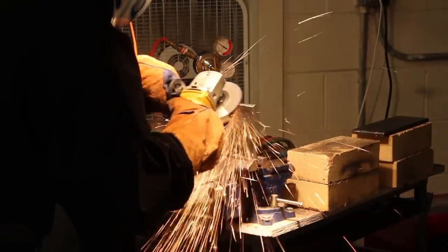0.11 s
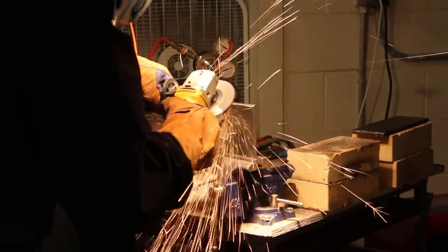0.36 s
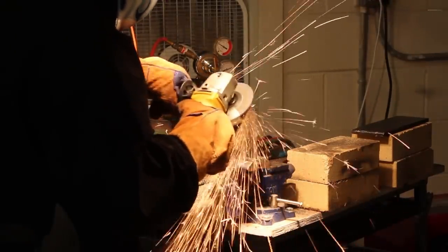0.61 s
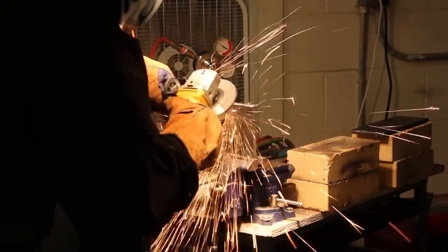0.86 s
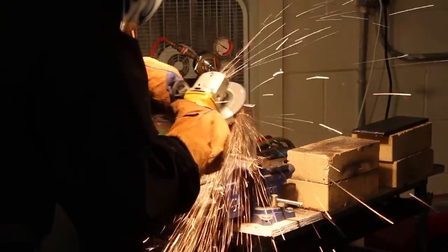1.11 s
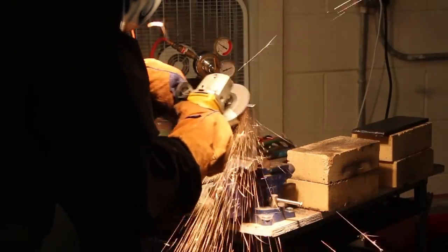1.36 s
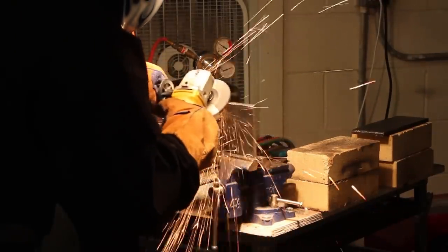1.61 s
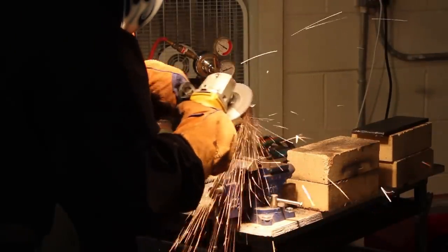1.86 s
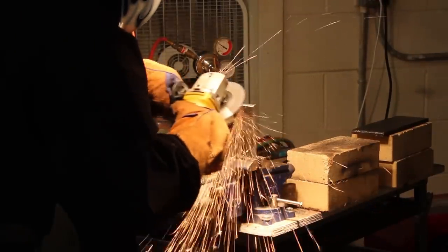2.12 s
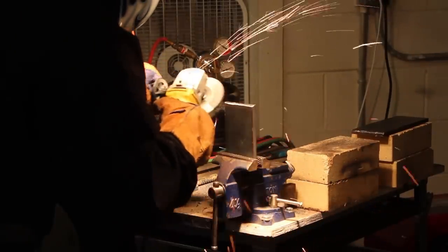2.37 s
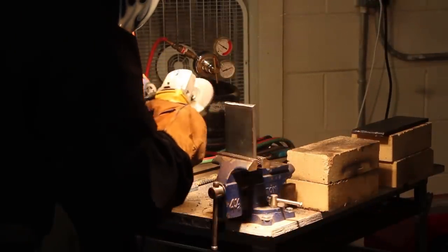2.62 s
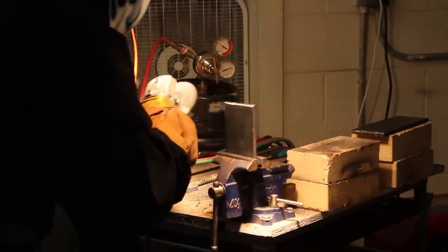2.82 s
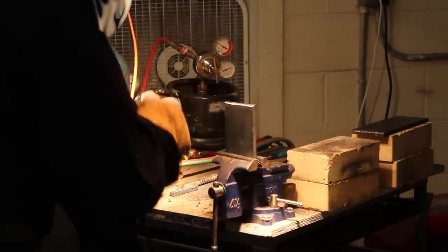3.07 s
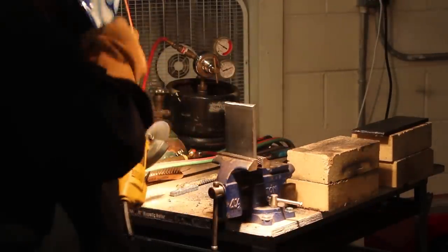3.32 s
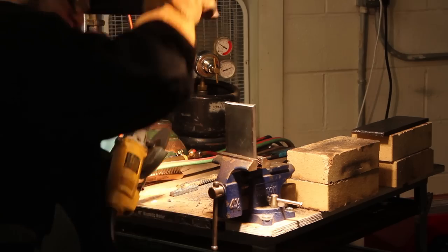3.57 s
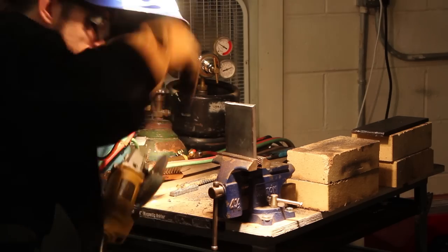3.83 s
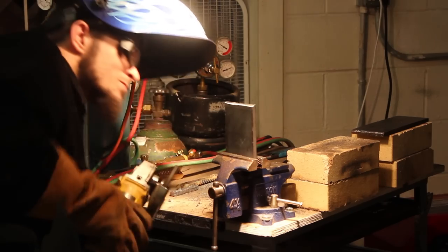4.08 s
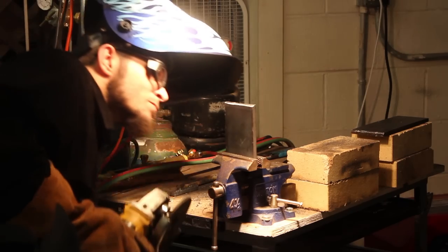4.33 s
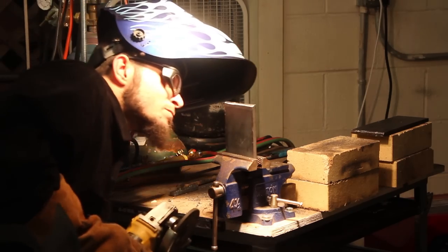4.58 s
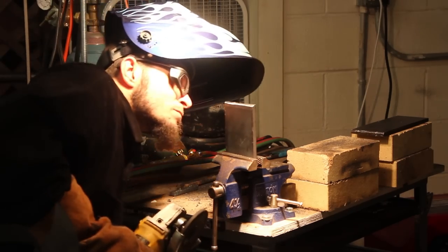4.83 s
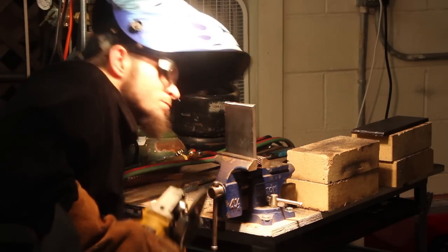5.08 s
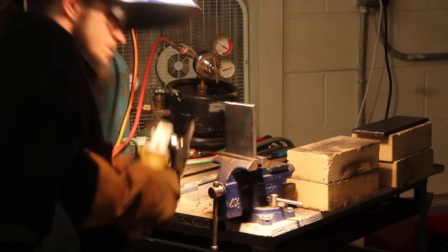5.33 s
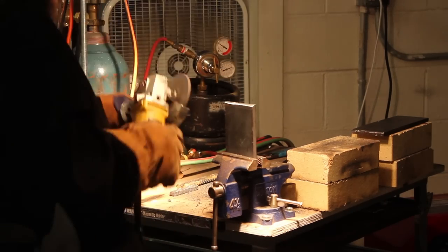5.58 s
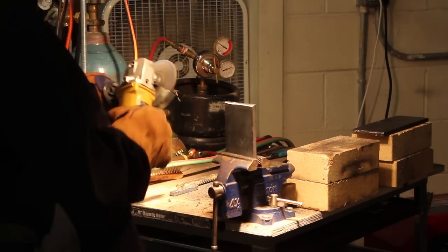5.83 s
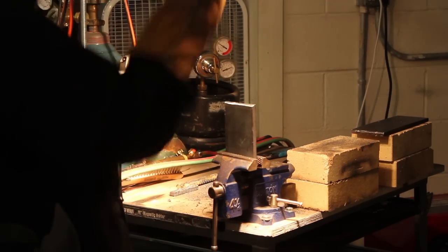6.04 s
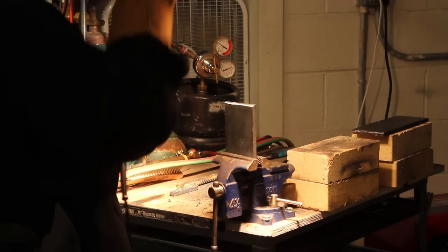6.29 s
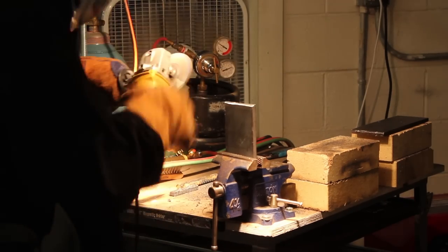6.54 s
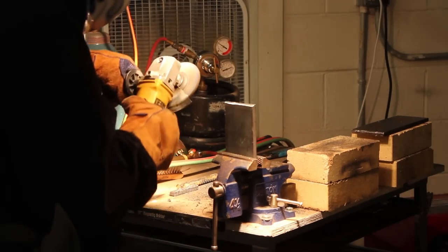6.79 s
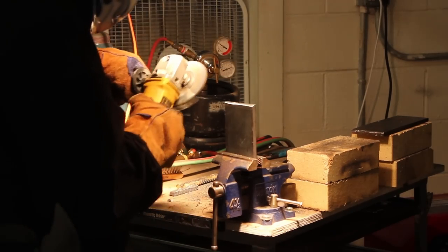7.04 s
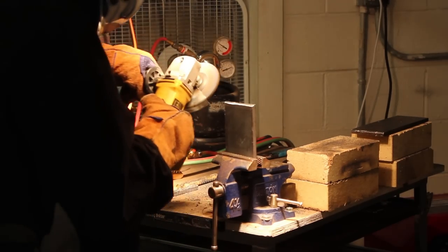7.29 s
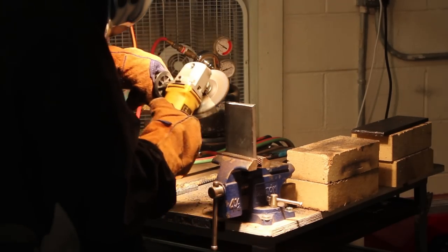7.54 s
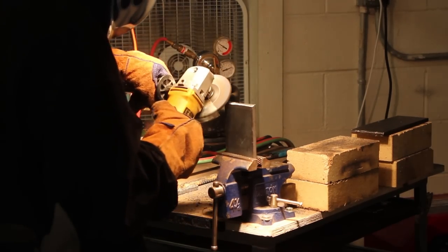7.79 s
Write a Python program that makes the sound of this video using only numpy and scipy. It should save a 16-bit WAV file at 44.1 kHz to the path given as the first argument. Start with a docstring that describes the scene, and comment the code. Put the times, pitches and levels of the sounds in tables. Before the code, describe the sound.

Bright, gritty metal grinding stops as the tool leaves the plate; its motor winds slowly down, then kicks back on with a rising whine.

```python
"""In a block-walled workshop with a faint mains hum, an angle grinder bites a steel plate in a vice.
It lifts off, is switched off, coasts down and is switched on again, heard by one microphone.
The wheel's rough rim repeats every turn and rings the plate, made as noise through resonances.
Gears and fan are shaped noise, the armature's whine is sine tones, and all follow one speed curve."""
import sys
import numpy as np
from scipy import signal
from scipy.fft import rfft, irfft, next_fast_len
from scipy.io import wavfile
from scipy.ndimage import uniform_filter1d, map_coordinates

SR = 44100
rng = np.random.default_rng(int(sys.argv[2]) if len(sys.argv) > 2 else 0)


def makeup_ratio(level_db):
    """Linear amplitude ratio for a level in decibels (20 dB per factor of ten)."""
    decades = np.asarray(level_db, float) / 20
    return 10 ** decades


def persist_wave(psi):
    """Save psi, clipped to +-1, as 16-bit WAV."""
    counts = np.round(np.clip(psi, -1, 1) * 32767).astype(np.int16)
    wavfile.write(sys.argv[1], SR, np.atleast_2d(counts).T)


N = 348831
T = np.arange(N) / SR  # time in seconds

# Levels in the tables are relative: the mix or the layer's own gain comes on top.

# How hard the hand works. Each row: time in seconds, pressure in dB, grip on the main mode in dB.
CUT = [(0.0, -31, -34), (0.03, -33.5, -28.5), (0.12, -33.5, -41.5), (0.18, -36, -34.5),
       (0.79, -33.5, -34.5), (0.91, -35.5, -25.5), (1.12, -36.5, -34.5), (1.16, -33, -30),
       (1.31, -35, -35.5), (1.54, -34.5, -31), (1.65, -35.5, -44.5), (1.87, -34.5, -34.5),
       (2.07, -38, -33.5), (2.16, -31, -29), (2.31, -34.5, -35.5), (2.36, -37.5, -35.5)]
# How fully plate, main mode, grit and body follow the swings of their control: shares from 0 to 1.
FOLLOW_SHARES = (0.73, 0.33, 1, 0.52)
# Plate, main mode, grit and body over their control, in dB.
LAYER_DB = (-2.5, -6.5, -4, -6.5)
# Resonances of the plate; the first three are its low body. Each row: pitch in Hz, width in Hz, level in dB.
PLATE_MODES = [(2380, 19, -4), (2910, 290, -5), (4052, 105, -6.5), (5330, 420, -2), (6457, 216, 6.5),
               (7523, 210, 5.5), (8200, 320, -5.5), (8840, 400, -23)]
# The plate's strongest mode and its skirt. Each row: pitch in Hz, width in Hz, level in dB.
MAIN_MODE = [(4770, 32, 1), (4780, 390, -7.5)]
# High resonances of the gritty layer. Each row: pitch in Hz, width in Hz, level in dB.
GRIT_MODES = [(9700, 620, -4), (11010, 350, -0.5), (10880, 500, 4.5), (12640, 1000, -7.5),
              (12660, 170, 0.5), (14860, 800, -6.5)]
# Tone colour of the low scrubbing. Each row: frequency in Hz, level in dB.
SCRUB_COLOUR = [(200, -27), (250, -13), (320, -2.5), (450, -17), (700, -12.5), (1200, -3), (1700, -7),
                (2300, 1), (3000, -55), (5000, -90)]
# Chatter bursts, by tones per wheel turn. Each row: centre in seconds, length in seconds, level in dB.
CHATTER_BURSTS = {"3": [(.05, 0.18, -78), (2.07, 0.17, -60)], "9": [(.8, 0.31, -57), (1.2, 0.058, -65),
                  (1.46, 0.24, -48), (2.36, 0.068, -49)], "11": [(.47, 0.12, -49.5), (.74, 0.14, -49.5),
                  (1.03, 0.12, -47), (1.28, 0.058, -43), (1.5, 0.17, -64)], "18": [(.03, 0.12, -44.5),
                  (.6, 0.11, -40), (1.22, 0.27, -53), (1.57, 0.39, -51), (1.9, 0.082, -56)]}
# The same tones between bursts. Each entry: tones per wheel turn, level in dB.
CHATTER_MURMUR = {"3": -69.5, "9": -65.5, "11": -62.5, "18": -81}
# Wheel unbalance under load. Each row: tones per wheel turn, level in dB.
UNBALANCE = [(2, -84), (2.563, -72.5), (3.998, -74.5), (6.002, -72)]

# Armature speed while cutting, then running free after the wheel lifts off, up to switch-off. Each row: time in
# seconds, speed in turns per second.
POWERED_SPEED = [(0, 425.8), (.35, 429), (.45, 432.5), (.85, 434.7), (1.29, 435.3), (1.63, 439),
                 (1.75, 444.5), (2.17, 448), (2.3, 441), (2.42, 448.6), (2.6, 467.5), (2.76, 477)]
# Whine, by tones per armature turn. Each entry: level in dB at FULL_HZ, power of speed,
# dB gained while accelerating, dB change while cutting.
WHINE = {"1": (-66, 3.7, 4, -6), "13": (-56, 2.1, 15, -8), "26": (-51, 3, 18, -20), "39": (-60, 2, 0, -40)}
# When each whine is heard, by tones per armature turn. Each entry: fading speed in turns per second,
# delay in seconds after switch-on.
AUDIBLE = {"1": (225, .24), "13": (160, .14), "26": (198, .3), "39": (290, 2)}
# How the housing lets tones out. Each row: frequency in Hz, level in dB.
VENTS = [(2250, 4), (2650, -1), (3000, 4), (3500, -2), (4200, 0), (4900, 0), (5350, 4), (5900, -2),
         (6400, -4), (7200, -7), (8600, -5), (10000, -4), (11300, -5), (12500, 0), (14100, -4),
         (15500, -18)]
# Tone colour of the gears. Each row: frequency in Hz, level in dB.
GEAR_COLOUR = [(88, -58), (150, -74), (278, -17), (422, -17), (566, -3.5), (832, 0.5), (1410, 1),
               (1640, -5.5), (5470, -4.5), (6000, -5.5), (7800, -16), (13200, -120)]
# Hollow low rattle of the gearbox. Each row: pitch in Hz, width in Hz, level in dB; used squared.
GEARBOX_MODES = [(506, 460, 3), (781, 440, 4)]
# Tone colour of the fan. Each row: frequency in Hz, level in dB.
FAN_COLOUR = [(2000, -16), (3500, -1), (6500, -1.5), (7800, -2), (9600, 1), (12000, 0), (14000, -2),
              (16000, -3), (17000, -50)]
# Resonances of the casing. Each row: pitch in Hz, width in Hz, level in dB.
CASING_MODES = [(1030, 73, -62), (2034, 910, 11.5), (5070, 59, -6), (6320, 114, 1), (9630, 250, 1.5),
                (11640, 760, -3), (15300, 1400, -10)]
# Resonances of the stator. Each row: pitch in Hz, width in Hz, level in dB.
STATOR_MODES = [(1290, 1350, -2.5), (1910, 210, 9), (2680, 420, 1.5), (4440, 300, 0.5), (4980, 160, 3.5),
                (6330, 900, -2.5)]
# Resonances of the brushes. Each row: pitch in Hz, width in Hz, level in dB.
BRUSH_MODES = [(9500, 370, -1.5), (12400, 730, -4.5), (15400, 390, -19)]
# Flares of the brush fizz. Each row: centre in seconds, level in dB.
FIZZ_FLARES = [(7.1, -54), (7.42, -53)]

# A small steel part rings. Each row: start in seconds, pitch in Hz, level in dB, time to fall 60 dB in seconds.
TINK = [(5.715, 8081, -63, .35)]
# Mains hum. Each row: pitch in Hz, level in dB.
HUM = [(59.2, -80.5), (118.4, -86.5)]
# Tone colour of the background hiss. Each row: frequency in Hz, level in dB.
FLOOR_COLOUR = [(12, -28), (20, -25), (32, -26), (43, -4), (65, -13.5), (234, -22), (255, -19.5),
                (293, -17.5), (434, -20), (3530, -16.5), (5080, -29), (9950, -19), (16000, -22)]
# How long the walls answer. Each row: frequency in Hz, time to fall 60 dB in seconds.
WALLS = [(200, 0.11), (2000, 1), (5000, 1), (12000, 0.6)]

# The hand, the main mode that makes wheel tones sing, and the fading body.
HAND_DB, HAND_HZ = -0.64, 7.91  # unsteadiness and its rate
LOCK_HZ, LOCK_WIDTH_HZ, LOCK_DB = 4810, 99, -4
BODY_FADE_DB_PER_S = 1  # the low modes weaken as the wheel works along the edge

# Speeds, in armature turns per second.
GEAR_RATIO = 3.25  # armature turns per wheel turn
SWITCH_ON_S = 7.0408
DRAG_S, FRICTION_HZ = 5.943, 369.7  # coasting: air drag acts on speed plus a friction term
FREE_HZ, KICK_S, CLIMB_S, CLIMB_SHARE = 509.8, 0.165, 0.45, 0.65  # a quick kick, then a slow climb
FULL_HZ = 477  # speed at which the motor levels are given

# Motor levels; they grow as a power of speed.
GEARS_DB, GEARS_POWER = -48, 2.135
GEARBOX_DB, GEARBOX_POWER = -75.5, 0.69  # outlasts the rest
FAN_DB, FAN_POWER, DRAUGHT_DB = -48, 3.35, -75  # the draught stays at any speed
GEARS_START_DB, GEARS_START_S = -54, 0.13  # extra noise at switch-on and its time to fall to 1/e
FAN_START_DB, FAN_START_S = -54, 0.3
POWERED_DB = 0.5  # the tones are stronger under current from switch-on
SIZZLE_HZ, SIZZLE_SPAN_HZ, SIZZLE_DB = 175, 45, -70  # a thin high hiss around one slow armature speed

# Switch-on current dies in two stages.
GROWL_DB, GROWL_FAST_S, GROWL_SLOW_DB, GROWL_SLOW_S = -41, 0.16, -59, 0.35
FIZZ_DB, FLARE_S = -53, 0.043
MAINS_HZ = 59.2
FLOOR_DB = -64
TOP_HZ = 15750


def grinding():
    """The rim drives the plate's modes; a few low tones of the wheel's turn chatter in bursts."""
    touch = makeup_ratio(-400 * np.clip(T - 2.37, 0, 1))  # the wheel lifts off
    press_db, grip_db = curves(CUT)
    controls = (press_db, grip_db, press_db, press_db)
    plate_db, ring_db, grit_db, body_db = (
        control[0] + share * (control - control[0]) + db + HAND_DB * wobble(HAND_HZ)
        for control, db, share in zip(controls, LAYER_DB, FOLLOW_SHARES))

    plate_force = rim(wear_hz=7, fresh=0.78, bump=0.053)
    plate = makeup_ratio(plate_db) * filtered(plate_force, modes(PLATE_MODES[3:]))
    body_force = rim(wear_hz=11, fresh=0.96, bump=0.29)
    body = makeup_ratio(body_db - BODY_FADE_DB_PER_S * T) * filtered(body_force, modes(PLATE_MODES[:3]))
    ring_force = rim(wear_hz=18, fresh=3.0, bump=0.12)
    # each mode alone, so that both add with the same sign
    ring = makeup_ratio(ring_db) * filtered(ring_force, lambda f: sum(modes([mode])(f) for mode in MAIN_MODE))
    grit = makeup_ratio(grit_db) * filtered(rim(wear_hz=16, fresh=2.5, bump=0.16), modes(GRIT_MODES))
    scrub = makeup_ratio(-51) * filtered(rim(wear_hz=12, fresh=1.5, bump=0.15), colour(SCRUB_COLOUR))

    low = body + grit + scrub + wheel_tones(grip_db)
    return touch * low + touch ** 0.54 * plate + touch ** 0.32 * ring  # the plate's modes ring on after lift-off, the main mode longest


def rim(wear_hz, fresh, bump):
    """Force of the rim: a rough profile that returns every turn and slowly wears, loose grit, a high spot."""
    wheel, size = turns() / GEAR_RATIO, 360
    profile = rng.standard_normal((200, size))
    place = wheel + 0.0025 * wobble(40)  # the hand-held contact point trembles
    path = [T * np.clip(wear_hz, 0, 24), place % 1 * size]
    repeat = map_coordinates(profile, path, order=1, mode="grid-wrap")
    high_spot = 1 + bump * np.cos(2 * np.pi * wheel) + 0.067 * np.cos(4 * np.pi * wheel)
    return high_spot * makeup_ratio(0.18 * wobble(36.83)) * (unit(repeat) + fresh * rng.standard_normal(N))


def wheel_tones(grip_db):
    """Tones tied to the wheel's turn: chatter, tones that sing as they pass the main mode, unbalance."""
    wheel = 2 * np.pi * turns() / GEAR_RATIO
    tones = []
    for name, rows in CHATTER_BURSTS.items():
        gain = makeup_ratio(CHATTER_MURMUR[name]) + swells(rows)
        tones.append((int(name), gain * makeup_ratio(0.64 * wobble(24.64))))
    for k in range(34, 38):
        offset = 2 * (k * speed() / GEAR_RATIO - LOCK_HZ) / LOCK_WIDTH_HZ
        near = 1 / np.sqrt(1 + offset ** 2)
        tones.append((k, near * makeup_ratio(grip_db + LOCK_DB + 3.5 * wobble(16))))
    for k, db in UNBALANCE:
        tones.append((k, makeup_ratio(db + 3.5 * wobble(7))))
    return sum(np.sqrt(2) * gain * np.sin(k * wheel + 0.71 * wobble(23.06)) for k, gain in tones)


def motor():
    """Gear rattle and fan hiss through the casing, with the armature's whine and a thin sizzle."""
    pace = speed() / FULL_HZ
    angle = 2 * np.pi * turns()
    casing = lambda f: 1 + abs(modes(CASING_MODES)(f))

    gears_gain = makeup_ratio(GEARS_DB) * pace ** GEARS_POWER + after_start(GEARS_START_DB, GEARS_START_S)
    beat = 1 + 0.15 * np.cos(angle / GEAR_RATIO) + 0.2 * np.cos(angle)
    rattle = beat * makeup_ratio(0.38 * wobble(25)) * rng.standard_normal(N)
    gears = gears_gain * filtered(rattle, lambda f: colour(GEAR_COLOUR)(f) * casing(f))
    gearbox_gain = makeup_ratio(GEARBOX_DB) * pace ** GEARBOX_POWER
    gearbox = gearbox_gain * filtered(rattle, lambda f: modes(GEARBOX_MODES)(f) ** 2)

    fan_gain = makeup_ratio(FAN_DB) * pace ** FAN_POWER + makeup_ratio(DRAUGHT_DB) + after_start(FAN_START_DB, FAN_START_S)
    hiss = (1 + 0.35 * np.cos(angle)) * makeup_ratio(1.06 * wobble(16)) * rng.standard_normal(N)
    fan = fan_gain * filtered(hiss, lambda f: colour(FAN_COLOUR)(f) * casing(f))

    near_speed = np.exp(-((speed() - SIZZLE_HZ) / SIZZLE_SPAN_HZ) ** 2)
    sizzle_gain = (T < SWITCH_ON_S) * near_speed * makeup_ratio(SIZZLE_DB + 1.8 * wobble(8))
    sizzle = sizzle_gain * filtered(hiss, modes([(14200, 1050, 0)]))
    return gears + gearbox + fan + whine() + sizzle


def whine():
    """Armature tones at whole multiples of its speed, unsteady and blurred, let out by the housing."""
    pace = speed() / FULL_HZ
    angle = 2 * np.pi * turns()
    powered = T >= SWITCH_ON_S
    cutting = np.clip((2.45 - T) / 0.092, 0, 1)
    pull = np.clip(powered * np.gradient(speed()) * SR / 800, 0, 1) ** 2
    # hard acceleration shakes the slot tone, 13 per turn
    strain = (0.5 + 0.7 * pull) * unit(uniform_filter1d(rng.standard_normal(N), size=120))
    total = 0
    for name, (full_db, power, pull_db, cut_db) in WHINE.items():
        k, (fade_hz, emerge_s) = int(name), AUDIBLE[name]
        db = full_db + pull_db * pull + cut_db * cutting + POWERED_DB * powered + 1.1 * wobble(6)
        if k > 1:
            db = db + along(VENTS, k * speed())
        heard = np.where(powered, (T - SWITCH_ON_S - emerge_s) / 0.027, (speed() - fade_hz) / 12)
        gain = pace ** power / (1 + np.exp(-np.clip(heard, -50, 50)))
        gain = gain * makeup_ratio(db + 2.9 * wobble(30)) * (1 + 0.15 * np.cos(angle / GEAR_RATIO))
        # air turbulence blurs each line
        gain *= 1 + 0.23 * unit(uniform_filter1d(rng.standard_normal(N), size=90))
        phase = k * angle + np.sqrt(k) * 0.14 * wobble(45) + (k == 13) * strain
        total = total + np.sqrt(2) * gain * np.sin(phase)
    return total


def inrush():
    """Mains half-cycles jolt the slow armature at switch-on and smear as it speeds up; the brushes fizz."""
    powered = T >= SWITCH_ON_S
    growl_gain = after_start(GROWL_DB, GROWL_FAST_S) + after_start(GROWL_SLOW_DB, GROWL_SLOW_S)
    fizz_gain = makeup_ratio(FIZZ_DB) + swells([(s, 2 * FLARE_S, db) for s, db in FIZZ_FLARES])
    since = np.clip(T - SWITCH_ON_S, 0, None)
    jolt = np.exp(-(since % (1 / (2 * MAINS_HZ))) / 0.00057)
    sharp = np.exp(-since / 0.033)
    drive = (1.7 * sharp * jolt + (1 - sharp) * (1 + 0.97 * jolt)) * rng.standard_normal(N)
    stator = lambda f: modes(STATOR_MODES)(f) + 0.078 * 1j * f / (1500 + 1j * f)
    growl = growl_gain * filtered(powered * drive, stator)
    fizz = fizz_gain * makeup_ratio(1.3 * wobble(30)) * filtered(powered * drive, modes(BRUSH_MODES))
    return np.sqrt((N / SR - SWITCH_ON_S) * SR / N) * (growl + fizz)  # levels hold for the powered part


def speed():
    """Armature turns per second: cutting, running free, coasting, then running up again."""
    off_s, off_hz = POWERED_SPEED[-1]
    coast = lambda t: (off_hz + FRICTION_HZ) / (1 + (t - off_s) / DRAG_S) - FRICTION_HZ
    since = np.clip(T - SWITCH_ON_S, 0, None)
    kick = np.exp(-(since / KICK_S) ** 1.5)
    lacking = (1 - CLIMB_SHARE) * kick + CLIMB_SHARE * np.exp(-since / CLIMB_S)
    climb = FREE_HZ - (FREE_HZ - coast(SWITCH_ON_S)) * lacking
    unpowered_or_climb = np.where(T < SWITCH_ON_S, coast(T), climb)
    return np.where(T < off_s, curves(POWERED_SPEED)[0], unpowered_or_climb)


def turns():
    """Armature angle in turns: the running sum of its speed."""
    return np.cumsum(speed()) / SR


def room(x):
    """The walls' answer is noise in which each frequency dies at its own pace."""
    hz, t, z = signal.stft(rng.standard_normal(SR), SR, nperseg=256)
    fading = z * makeup_ratio(-60 * t / along(WALLS, hz)[:, None])
    tail = signal.istft(fading, SR, nperseg=256)[1]
    late = np.pad(x, (300, 0))  # the answer starts 300 samples late
    return signal.fftconvolve(late, tail / np.linalg.norm(tail))[:N]


def workshop():
    """Background hiss is shaped noise, mains hum is wavering sines, one small part rings and dies away."""
    hum = sum(np.sqrt(2) * makeup_ratio(db + 2.6 * wobble(7.4)) * np.sin(2 * np.pi * hz * T) for hz, db in HUM)
    tink = sum((T > s) * makeup_ratio(db - 60 * abs(T - s) / t60) * np.sin(2 * np.pi * hz * T)
               for s, hz, db, t60 in TINK)
    return hum + tink + makeup_ratio(FLOOR_DB) * filtered(rng.standard_normal(N), colour(FLOOR_COLOUR))


def unit(x):
    """Scale to rms 1."""
    return x / np.sqrt(np.mean(x ** 2) + 1e-20)


def curves(rows):
    """One value per sample for each column after the time."""
    s, *cols = np.transpose(rows)
    return [np.interp(T, s, c) for c in cols]


def along(points, hz):
    """Read a value between (Hz, value) points on a log axis."""
    f, v = np.transpose(points)
    return np.interp(np.log(hz + 1), np.log(f + 1), v)


def wobble(rate):
    """A smooth random curve with rate knots a second, at most 60."""
    return map_coordinates(rng.standard_normal(int(N * 60 / SR) + 4), [T * min(rate, 60)])


def swells(rows):
    """Bell-shaped gains from (centre s, length s, dB) rows."""
    return sum(makeup_ratio(db) * np.exp(-(2 * (T - s) / length) ** 2) for s, length, db in rows)


def after_start(db, fall_s):
    """A gain that jumps up at switch-on and decays."""
    return (T >= SWITCH_ON_S) * makeup_ratio(db) * np.exp(-abs(T - SWITCH_ON_S) / fall_s)


def filtered(x, response):
    """x times a complex response of frequency, brought to rms 1."""
    m = next_fast_len(N + SR // 2)
    return unit(irfft(rfft(x, m) * response(np.fft.rfftfreq(m, 1 / SR)), m)[:N])


def modes(table):
    """Response of a set of resonances with alternating signs; each rings after it is struck."""
    def response(f):
        total = 0
        for k, (c, w, db) in enumerate(table):
            total = total + (-1) ** k * makeup_ratio(db) * 1j * f * w / (c * c - f * f + 1j * f * w)
        return total
    return response


def colour(spectrum):
    """Response that follows a short spectrum."""
    return lambda f: makeup_ratio(along(spectrum, f))


def scene():
    """Direct sound, room and background, the same on both channels."""
    tool = grinding() + motor() + inrush()
    mix = makeup_ratio(-1.5) * tool + makeup_ratio(-4.5) * room(tool) + workshop()
    return np.tile(mix, (2, 1))


def roll_off(x):
    """The treble ends steeply here."""
    return signal.sosfilt(signal.butter(12, 16800, fs=SR, output="sos"), x)


def record(dry):
    """The microphone's signal gets a sharp upper limit and a small steady offset."""
    kept = irfft(rfft(dry) * (np.fft.rfftfreq(N, 1 / SR) < TOP_HZ), N)
    return roll_off(kept + 0.00086)


dry = scene()
out = record(dry)
persist_wave(out)
```